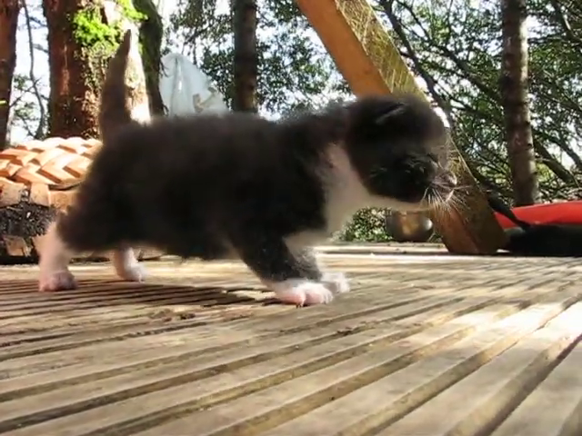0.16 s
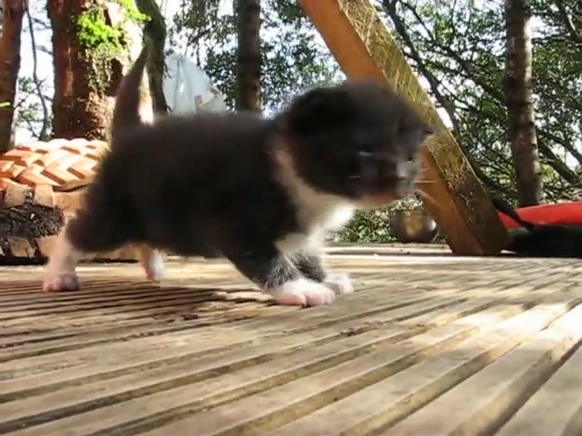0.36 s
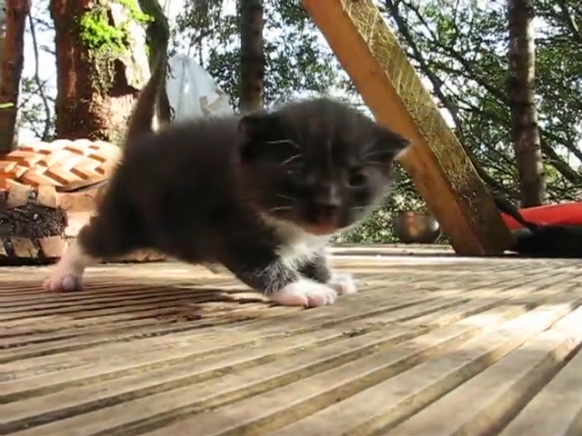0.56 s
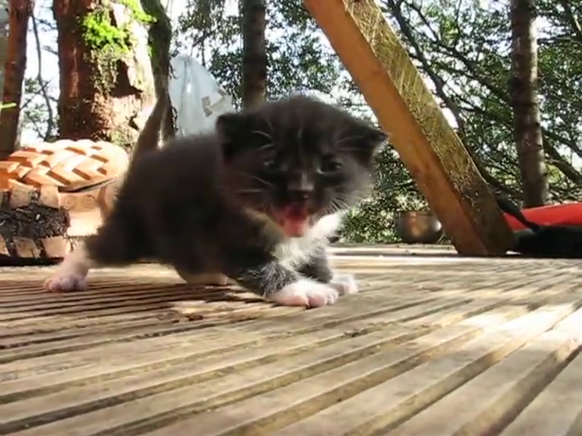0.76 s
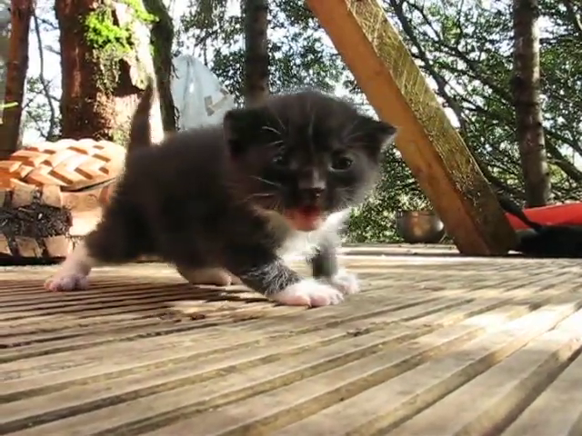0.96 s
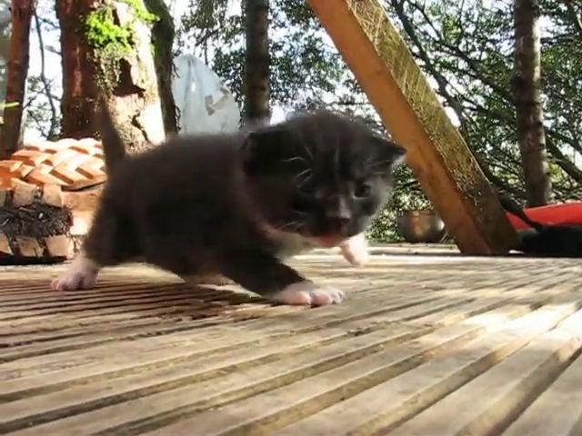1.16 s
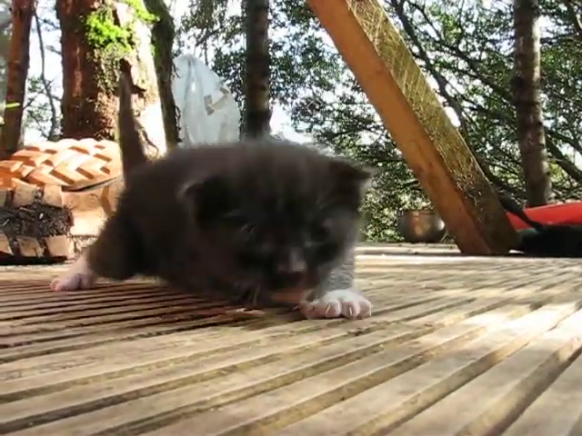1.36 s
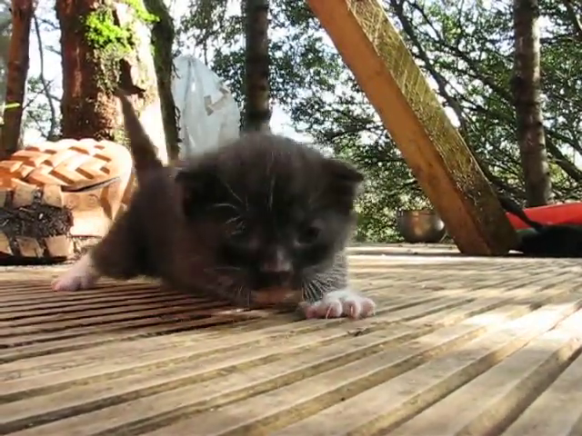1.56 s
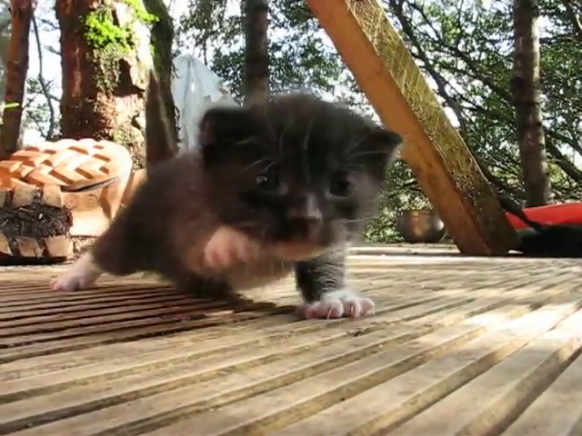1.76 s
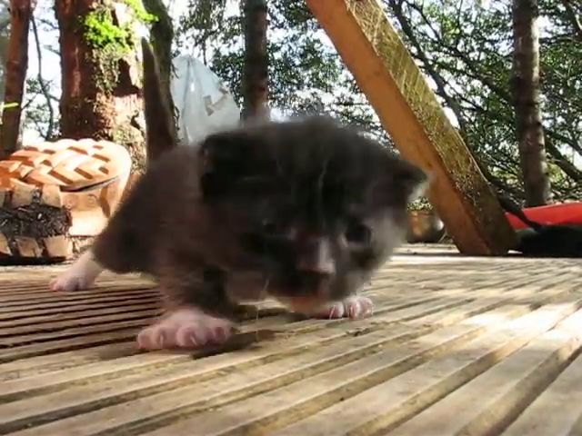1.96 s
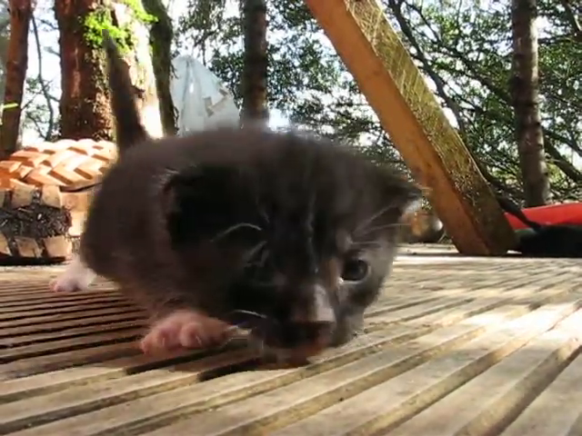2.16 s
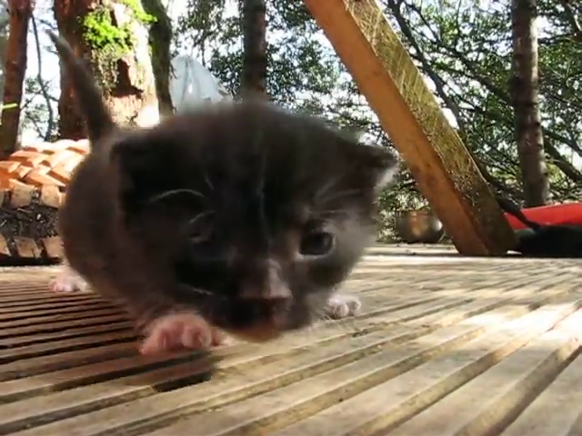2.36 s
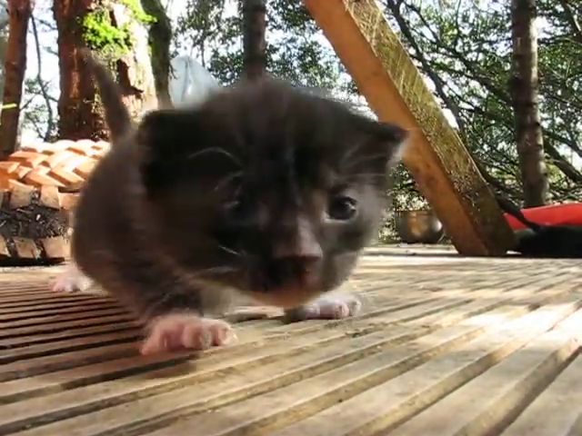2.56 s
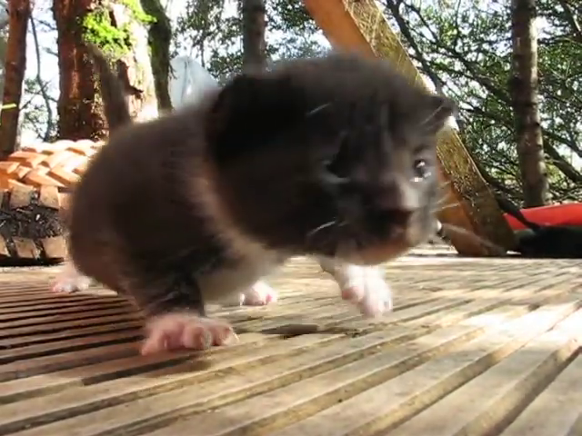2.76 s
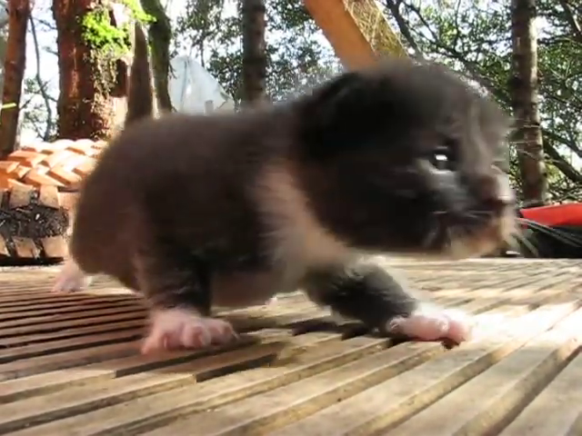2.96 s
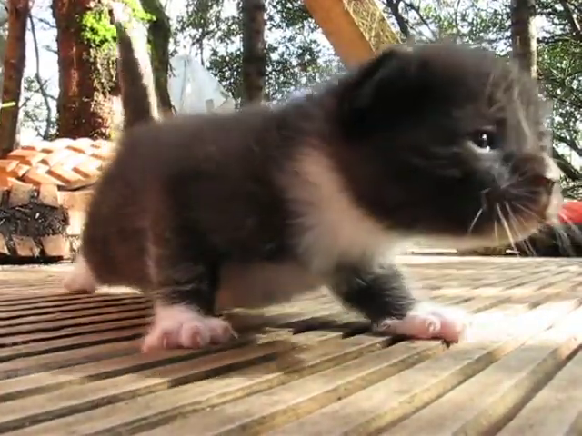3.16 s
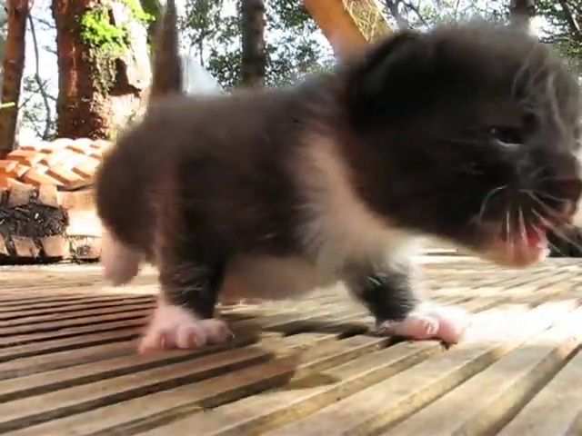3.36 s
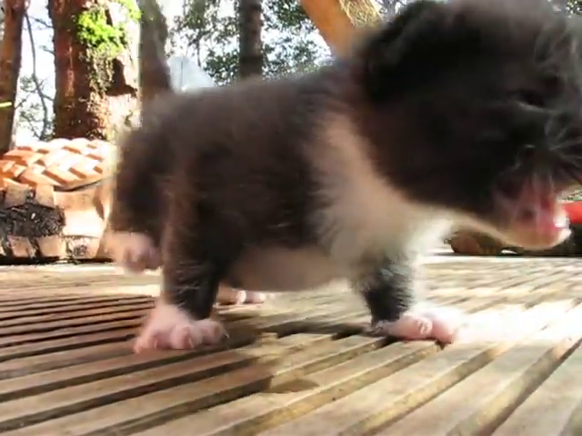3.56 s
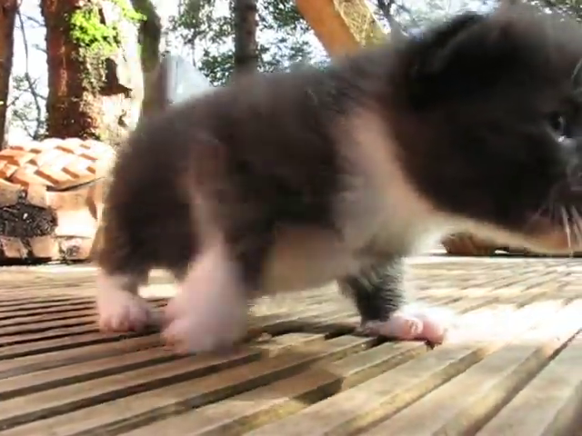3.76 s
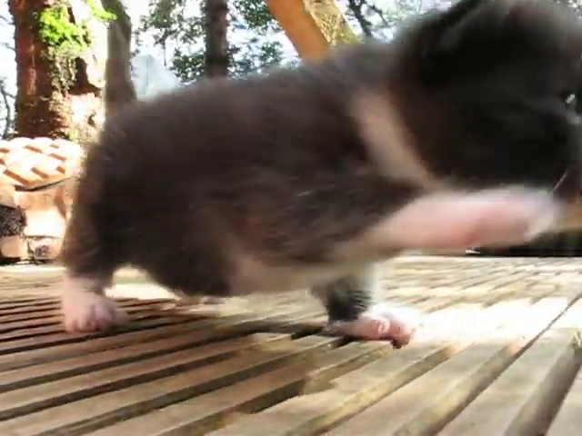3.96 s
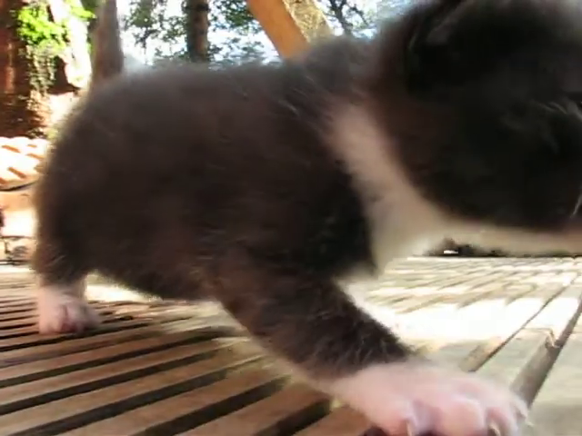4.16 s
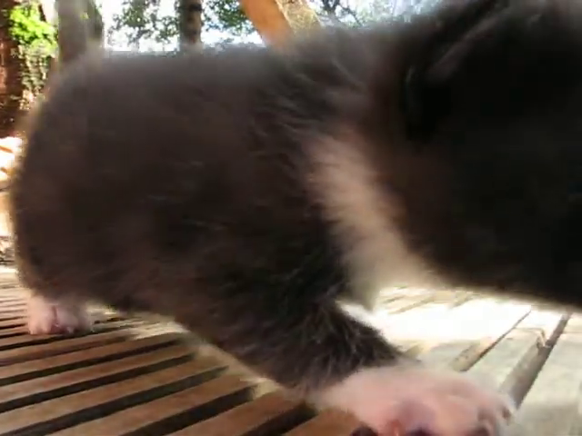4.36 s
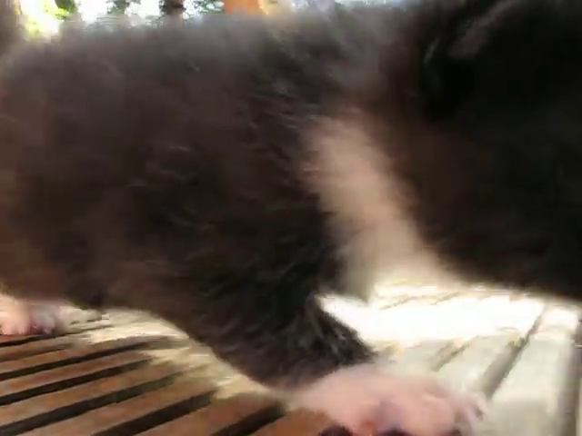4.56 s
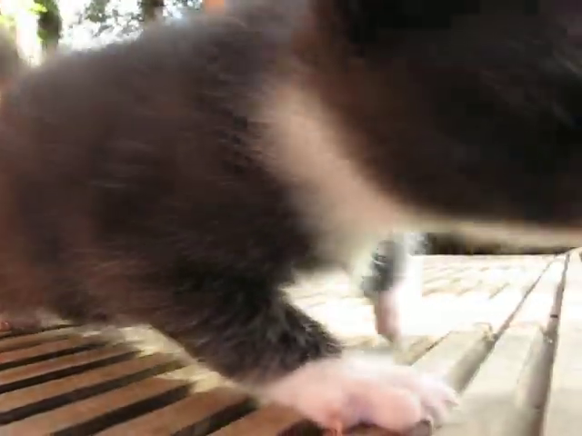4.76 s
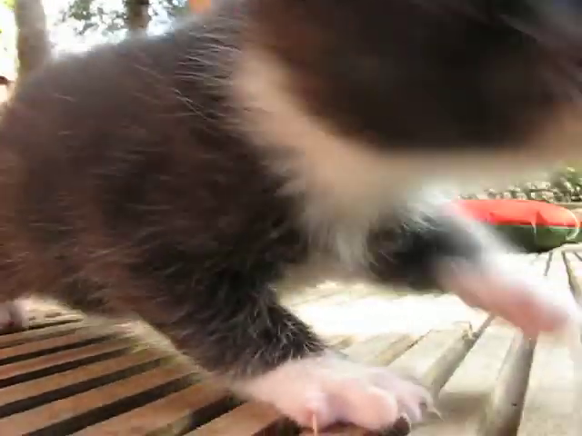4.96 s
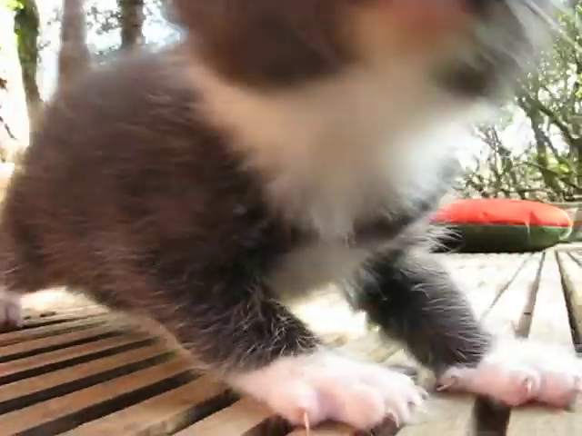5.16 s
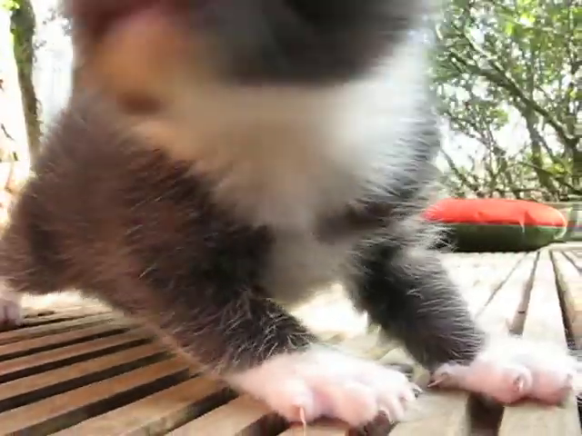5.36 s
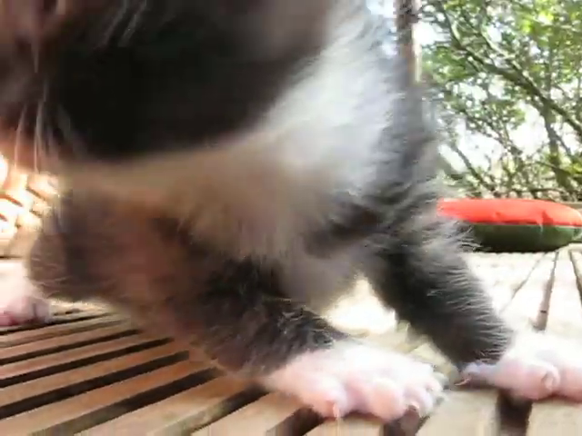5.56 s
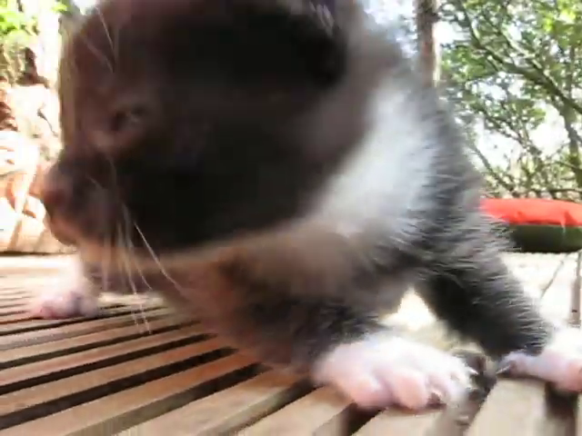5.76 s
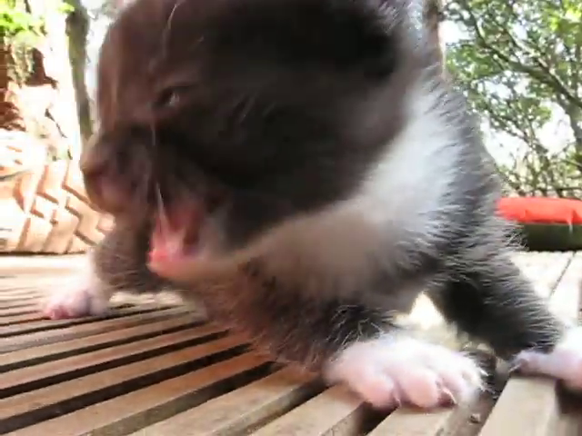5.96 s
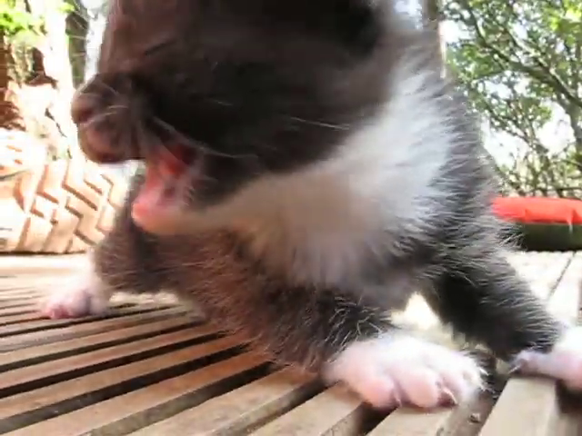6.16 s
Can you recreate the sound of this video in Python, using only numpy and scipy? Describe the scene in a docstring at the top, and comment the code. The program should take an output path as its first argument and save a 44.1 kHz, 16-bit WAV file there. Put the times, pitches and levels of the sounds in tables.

```python
"""On a wooden deck, close to a stereo microphone: first paw thuds, and gusts rumbling mostly on the left port.
A very young kitten mews (harmonics of a wavering pitch that breaks towards a whistle), then boards creak in pulses.
A second mew has faint squeaks about it; a hard object is knocked and rattles back, cracking and ringing.
Croaks surround a low third mew, fur (coloured noise) brushes close by, and a fourth, strained mew follows.
Throughout, noise makes the murmur and leaf hiss of trees all round, with a faint thin whine."""
import sys
import numpy as np
from scipy import signal
from scipy.fft import rfft, irfft, next_fast_len
from scipy.io import wavfile
from scipy.ndimage import map_coordinates

SR = 44100
rng = np.random.default_rng(int(sys.argv[2]) if len(sys.argv) > 2 else 0)


def log_audio(samples):
    """Write samples as a 16-bit WAV file to the path given in sys.argv[1]."""
    # one column per channel
    frames = np.atleast_2d(samples).T
    # limit to full scale, then quantise
    limited = np.clip(frames, -1, 1)
    pcm = np.round(limited * 32767).astype(np.int16)
    wavfile.write(sys.argv[1], SR, pcm)


N = 273861
TIME = np.arange(N) / SR
TOP_HZ = 15750  # upper band limit

# Mews: (time [s], pitch before any leap [Hz], effort before mouth and break gains [dB])
FIRST_MEW = [(0.537, 520, -50.5), (0.611, 990, -53), (0.65, 1270, -44), (0.697, 1506, -42),
             (0.708, 1410, -44), (0.727, 1583, -40.5), (0.739, 1516, -44), (0.754, 1586, -43.5),
             (0.84, 1677, -43), (0.935, 1572, -47.5), (1.015, 1377, -52.5)]
SECOND_MEW = [(3.259, 1569, -39), (3.296, 1653, -32), (3.327, 1622, -31.5), (3.365, 1835, -32.5),
              (3.47, 1918, -31.5), (3.56, 1821, -32.5), (3.588, 1800, -34.5), (3.598, 1807, -39),
              (3.645, 1780, -46)]
THIRD_MEW = [(4.886, 818, -41), (4.93, 858, -35), (4.975, 856, -38), (4.99, 850, -35),
             (5.045, 849.6, -35.5), (5.081, 780, -41), (5.104, 726, -46), (5.172, 693, -48.5)]
FOURTH_MEW = [(5.81, 770, -41), (5.832, 936, -50), (5.878, 1202, -44), (5.913, 1296, -46.5),
              (5.931, 1441, -43), (5.985, 1500, -43), (6.02, 1773, -37), (6.062, 1850, -37.5),
              (6.16, 1860, -44), (6.215, 1860, -53)]
# Mouth colour on harmonics from the third up, one per mew: (frequency [Hz], relative level [dB])
OPEN_MOUTH = [(2000, 26), (3000, 12), (4100, 6.5), (4750, -6), (5200, 5), (6700, 0), (7600, -1),
              (9000, -23), (11500, -18), (13300, -4.5), (15000, -37)]
WIDE_MOUTH = [(5000, 0.5), (5700, -15), (6500, -21), (7500, 5.5), (8500, -18), (9600, -9), (11400, -5.5),
              (12900, -13), (14200, -41)]
HALF_SHUT_MOUTH = [(1500, -10), (2500, 7), (3300, -4), (4400, -6.5), (6000, -10.5), (7200, -0.5),
                   (7900, -39), (14000, -51)]
STRAINED_MOUTH = [(3600, 16), (4400, -12), (5100, 4), (5500, -16), (6000, 0), (7300, 3.5), (8700, -12.5),
                  (11000, -22.5), (12700, 2.5), (14300, -33)]
# Jaw opening and closing, a row a mew; times from its start: (widest [s], closing time [s],
# resonance shut [Hz], resonance wide [Hz], lips part [s], overtone dulling before that [dB])
JAWS = [(0.19, 0.2, 1890, 3400, 0.19, -1.5), (0.094, 0.22, 2145, 3190, 0.061, 10),
        (0.08, 0.101, 1564, 1980, 0.093, 22), (0.16, 0.12, 2034, 3247, 0.064, 15)]
# Break of the voice, a row a mew; times from its start: (cracks [s], strain builds for [s], settles [s],
# strain while cracked [0-1], flip rate [1/s], pitch leap [share], whistle gain on first harmonic [dB],
# surge in mid-flip [dB], level flutter [dB])
VOICE_BREAKS = [(.379, 0.00874, .459, 0.5, 220, .18, 0, 10, 2),
                (.23, 0.065, .336, 0.1, 260, .225, -9, 6, 6), (.175, .07, .29, 0.6, 80, .19, 6, -1.5, 9),
                (.24, .075, .356, .43, 300, .225, 2, 0.5, 5.5)]
# Tone and place, a row a mew: (second harmonic [dB], higher overtones [dB], odd overtones [dB],
# rasp before strain [dB], hoarseness [share], left minus right below the treble lean [dB], left lead [ms])
VOICES = [(-3.5, 5, -6, -25, 0.039, -4.5, 0.016), (-19, -2, 2.5, -21.5, 0.0074, -7.5, -0.059),
          (-21, 4, 6, -21, 0.068, 5, 0.14), (-6, 7, -6, -25, 0.026, -4.5, 0.025)]
# Squeaks and croaks, mouth nearly shut: (time [s], length [s], mean pitch [Hz],
# first harmonic before swell and pan [dB], roughness [share], slope [dB per harmonic])
CROAKS = [(3.241, 0.019, 1577, -32.5, 0.03, -12), (3.681, 0.048, 2180, -48, 0.02, -17),
          (4.744, 0.11, 461, -43.5, .11, -3.5), (4.823, .075, 421.5, -42, .15, -2.5),
          (5.031, 0.17, 411, -50.5, 0.16, -1)]
# Soft blows on the deck: (time [s], frequency [Hz], level before board and scuff gains [dB],
# board t60 [s], left minus right [dB])
THUDS = [(0.058, 180, -24.5, 0.028, 22.5), (0.143, 110, -20.5, 0.055, 25.5), (0.146, 216, -30.5, 0.057, 18),
         (1.357, 94, -30, 0.05, 32), (3.133, 670, -22.5, 0.012, 4.5), (3.888, 380, -23, 0.014, 2),
         (4.722, 170, -39, 0.033, 2), (5.208, 166, -40, 0.053, 4)]
# Ticks and scuffs of claws and mouth: (time [s], level before pan [dB], centre [Hz], t60 [s])
TICKS = [(0.6207, -29.5, 5500, .008), (1.026, -42, 5350, 0.18), (2.409, -31.5, 4560, 0.011),
         (2.449, -26.5, 2220, 0.0062), (2.841, -43, 2300, 0.14), (3.076, -45, 654, 0.2),
         (3.13, -32.5, 3400, 0.019), (3.297, -27.5, 5500, 0.0077), (3.87, -41, 1470, 0.074),
         (3.898, -45, 4100, 0.12), (4.106, -38, 860, 0.067)]
# Fur brushing close by: (time [s], level before flutter [dB])
FUR = [(5.42, -67), (5.57, -46), (5.68, -38), (5.76, -40), (5.82, -49)]
# Colour of the brushing: (frequency [Hz], relative level [dB])
FUR_COLOUR = [(200, -20), (700, 10.5), (1200, -1), (3000, -6), (7500, -1), (15500, -28)]
# Contacts of the knocked object: (time [s], crack [dB], ring [dB], brightness [dB per octave])
KNOCKS = [(4.1399, -8.5, -20.5, 0), (4.1459, -11, -19.5, 3.5), (4.1509, -12.5, -16, 1.5),
          (4.1926, -27, -28, -5.5), (4.212, -12.5, -20, 3), (4.2152, -9.5, -39, 3), (4.2439, -24, -29.5, 0),
          (4.268, -40, -32, -9)]
# Modes of the knocked object: (frequency [Hz], mean relative level [dB], t60 [s])
RING_MODES = [(356, -16.5, 0.067), (455, -20, 0.13), (746, -11, 0.086), (850, -9.5, 0.072),
              (1165, -3.5, 0.031), (1261, -3.5, 0.11), (1860, -12, .04), (3245, -14, 0.088),
              (4660, -22, 0.021), (5330, -11, 0.068)]
# Colour of the crack before each contact's brightness: (frequency [Hz], relative level [dB])
CRACK_COLOUR = [(150, -24), (450, 0), (1000, -0.5), (4500, 2.5), (9000, -13), (10500, -41), (15000, -38)]
# Board creaks: (time [s], length [s], slip rate [1/s], pulse level before pressure, chance and pan [dB])
CREAKS = [(1.897, 0.064, 360, -26), (2.326, 0.026, 180, -16.5), (2.819, 0.017, 400, -28),
          (5.33, 0.056, 390, -30.5)]
# Colour of one slip: (frequency [Hz], relative level [dB])
SLIP_COLOUR = [(200, -10), (900, -6), (1900, -2.5), (3200, -5.5), (4500, -17.5), (15000, -70)]
# Gusts on the microphone ports: (peak time [s], level before port gain [dB], half length to 1/e [s])
GUSTS = [(0.03, -41, 0.074), (.18, -48, 0.059), (0.476, -50.5, 0.22), (1.407, -48, 0.055),
         (1.855, -51.5, .06), (2.074, -55, 0.2), (2.333, -46.5, 0.071)]
# Colour of the wind rumble: (frequency [Hz], relative level [dB])
RUMBLE_COLOUR = [(20, -7), (50, 8.5), (90, 0.5), (300, -18), (600, -62)]
# Trees all round: (time [s], murmur before sway [dB], hiss before sway and make-up gain [dB])
TREES = [(0.0, -46.5, -47.5), (3.23, -52.5, -50), (5.1, -48, -48), (5.52, -48, -48.5), (6.21, -47, -48)]
# Colour of the open air: (frequency [Hz], relative level [dB])
AIR_COLOUR = [(60, -18.5), (150, -2.5), (220, -4), (350, -0.5), (520, -4.5), (1700, -6), (3700, -10),
              (7200, -7), (8500, -10.5), (10500, -21), (15600, -29)]
# Spread of the open air: (frequency [Hz], left-right likeness [-1 to 1])
AIR_LIKENESS = [(300, 0.97), (1400, 0.53), (6000, 0)]
# Lean of the open air: (frequency [Hz], left minus right [dB])
AIR_LEAN = [(700, 0), (2200, -2), (8100, -3), (13000, -1.5)]

EDGE_S, LIPS_S = .008, 0.012  # voice fades in or out; lips part
MOUTH_Q, MOUTH_STEEP = 10.1, 1.275  # sharpness of the mouth resonance and of its skirts
CALM_STRAIN, WHISTLE_STRAIN = 0.037, 0.92  # 0 clean, 0.5 breaking, 1 whistle
CRACK_DULL_DB = 2.5  # overtones lost when the voice is fully broken
WHISTLE_SECOND_DB = -12  # the whistle's octave, relative to the effort
KNOCK_LAG_MS = 0.11  # the object lies to the right: the left port hears it later
CALM_DB = -69.5  # air between gusts, before port gain


def amp(db):
    """Decibels to gain."""
    return 10 ** (np.asarray(db) / 20)


def unit(x):
    """Scale to rms 1."""
    return x / np.sqrt(np.mean(x ** 2) + 1e-20)


def along(points, hz):
    """Read (frequency, value) points on a log frequency axis."""
    f, v = np.transpose(points)
    return np.interp(np.log(hz + 1), np.log(f + 1), v)


def curves(rows, t=TIME):
    """Read each column after the time at times t."""
    s, *cols = np.transpose(rows)
    return [np.interp(t, s, c) for c in cols]


def wobble(rate, size=N):
    """A smooth random curve, rate knots a second."""
    knots = rng.standard_normal(size // 8 + 4)
    return map_coordinates(knots, [np.arange(size) * rate / SR], mode="mirror")


def filtered(x, response):
    """Multiply the spectrum of x by a response of frequency."""
    size = x.shape[-1]
    m = next_fast_len(size + 4096)
    return irfft(rfft(x, m) * response(np.fft.rfftfreq(m, 1 / SR)), m)[..., :size]


def noise(spectrum, size=N):
    """Coloured noise of rms 1."""
    return unit(filtered(rng.standard_normal(size), lambda hz: amp(along(spectrum, hz))))


def panned(x, left_db):
    """A left-right pair with a level difference."""
    return np.array([x * amp(left_db / 2), x * amp(-left_db / 2)])


def add(out, s, sound):
    """Mix a stereo sound in at time s."""
    part = out[:, max(round(s * SR), 0):][:, :sound.shape[1]]
    part += sound[:, :part.shape[1]]


def kitten():
    """Two thin, high mews, a lower croaky one with the mouth half shut, and a last strained one."""
    out = np.zeros((2, N))
    mews = [FIRST_MEW, SECOND_MEW, THIRD_MEW, FOURTH_MEW]
    mouths = [OPEN_MOUTH, WIDE_MOUTH, HALF_SHUT_MOUTH, STRAINED_MOUTH]
    for rows, *manner in zip(mews, JAWS, VOICE_BREAKS, VOICES, mouths):
        add(out, rows[0][0], mew(rows, *manner))
    return out


def mew(rows, jaw, voice_break, tone, mouth):
    """Vocal-fold harmonics through a moving jaw resonance; strain flips the folds between two registers."""
    widest_s, closing_s, shut_hz, wide_hz, lips_s, dull_db = jaw
    crack_s, build_s, settle_s, cracked, flip_rate, leap, whistle_db, surge_db, flutter_db = voice_break
    second_db, high_db, odd_db, rasp_db, hoarse, left_db, lead_ms = tone
    t = np.arange(0, rows[-1][0] - rows[0][0], 1 / SR)
    size = len(t)
    chest_hz, effort_db = curves(rows, t + rows[0][0])

    resonance_hz = np.interp(t, [0, widest_s, widest_s + closing_s], [shut_hz, wide_hz, shut_hz])
    lips_shut = np.clip(.5 - (t - lips_s) / LIPS_S, 0, 1)
    overtones = amp(effort_db + high_db - dull_db * lips_shut)

    # strain near one half leaves the voice most unsteady
    strain_times = [crack_s, crack_s + build_s, settle_s - EDGE_S, settle_s]
    strain = np.interp(t, strain_times, [CALM_STRAIN, cracked, cracked, WHISTLE_STRAIN])
    unsteady = np.sqrt(np.clip(strain * (1 - strain), 0, 1))
    may_flip = np.clip((t - crack_s) / .004, 0, 1)
    register_pull = 2.2 * (strain - .5) / (unsteady + .2)
    register_chance = 2.6 * unsteady * wobble(flip_rate, size)
    whistle = may_flip * (.5 + .5 * np.tanh(register_pull + register_chance))
    flipping = 4 * whistle * (1 - whistle)  # peaks midway between the registers
    broken = may_flip * (2 * unsteady) ** 2
    shake_db = flutter_db * broken * np.tanh(2 * wobble(flip_rate, size))

    break_db = whistle_db * whistle + surge_db * flipping + shake_db
    first = amp(effort_db + mouth_db(chest_hz, resonance_hz) + break_db)
    second = amp(effort_db + mouth_db(2 * chest_hz, resonance_hz) + second_db)
    second = second + amp(effort_db + WHISTLE_SECOND_DB) * whistle

    jitter = .0055 * wobble(130, size) + .0065 * wobble(900, size)
    hoarseness = hoarse * unsteady * wobble(1200, size)
    pitch = chest_hz * (1 + leap * whistle) * (1 + jitter + hoarseness)
    phase = 2 * np.pi * np.cumsum(pitch) / SR

    k = np.arange(1, 17)[:, None]  # harmonic numbers
    upper_hz = k[2:] * pitch
    # the shape of the fold's pulse sets the odd overtones apart
    upper = amp(along(mouth, upper_hz) + odd_db * (k[2:] % 2)) * (upper_hz < TOP_HZ)
    upper = upper / np.linalg.norm(upper, axis=0) * overtones * amp(-CRACK_DULL_DB * broken)
    gains = np.vstack([first, second, upper])
    # flutter grows up to the sixth harmonic
    shimmer = amp(.3 * np.minimum(k, 6) * np.array([wobble(300, size) for _ in k]))
    voice = np.sqrt(2) * np.sum(gains * shimmer * np.sin(k * phase), axis=0)

    # air rushes through the folds once a cycle, more so while they are unsteady
    rush_colour = [(1200, -22), (1900, 0), (2400, 9), (3200, -8)] + [p for p in mouth if p[0] > 4000]
    rush = noise(rush_colour, size) * (1 + np.cos(phase))
    rush_level = np.sqrt(np.linalg.norm(gains, axis=0) * overtones)
    voice = voice + amp(rasp_db) * (1 + 2 * unsteady) * rush_level * rush
    voice = voice * np.clip(np.minimum(t, t[-1] - t) / EDGE_S, 0, 1)

    def ports(hz):
        """One port hears the voice first; the topmost treble leans left."""
        lean_db = left_db + along([(7000, 1), (9800, -2.5), (13000, 13.5)], hz)
        lead = np.exp(1j * np.pi * hz * lead_ms / 1000 * np.array([[1], [-1]]))
        return lead * panned(0.97, lean_db)

    return filtered(voice, ports)


def mouth_db(hz, centre_hz):
    """Gain of the mouth's lowest resonance."""
    x = hz / centre_hz
    return -10 * MOUTH_STEEP * np.log10((1 - x ** 2) ** 2 + (x / MOUTH_Q) ** 2)


def croaks():
    """Squeaks about the second mew, croaks round the third: a few harmonics of an unsteady pitch."""
    out, k = np.zeros((2, N)), np.arange(1, 5)[:, None]
    for s, length, hz, db, rough, tilt_db in CROAKS:
        size = round(length * SR)
        unsteady = rough * (wobble(70, size) + wobble(900.5, size))
        phase = 2 * np.pi * np.cumsum(hz * (1 + unsteady)) / SR
        swell = np.sqrt(np.abs(np.sin(np.pi * np.arange(size) / size))) * amp(2.4 * wobble(115, size))
        harmonics = np.sum(amp(db + tilt_db * (k - 1)) * np.sin(k * phase), axis=0)
        add(out, s, panned(np.sqrt(2) * swell * harmonics, 3.4))
    return out


def paws():
    """Dull thuds: each blow sounds a quickly damped board tone and a little scuff."""
    out, t = np.zeros((2, N)), np.arange(SR // 4) / SR
    for s, hz, db, t60, left_db in THUDS:
        swell = (1 - np.exp(-t * hz)) ** 2
        board = amp(7.0 - 60 * t / t60) * np.sin(2 * np.pi * hz * t)
        scuff_colour = [(hz / 4, -12), (hz, 0), (hz * 8, -45), (hz * 20, -80)]
        scuff = amp(-8 - 60 * t / 0.076) * noise(scuff_colour, len(t))
        add(out, s, panned(amp(db) * swell * (board + scuff), left_db))
    return out


def ticks():
    """Ticks and scuffs of claws and mouth: decaying noise about a centre frequency, leaning right."""
    out, t = np.zeros((2, N)), np.arange(SR // 4) / SR
    for s, db, hz, t60 in TICKS:
        tick = noise([(hz / 6, -18), (hz, 0), (hz * 3, -22), (hz * 8, -40)], len(t))
        add(out, s, panned(amp(db - 60 * t / t60) * tick, -6.0))
    return out


def fur():
    """A soft rustle, noise separate at each port, as the kitten turns right by the microphone."""
    level_db = curves(FUR)[0] + 2.0 * wobble(40)
    rustle = np.array([noise(FUR_COLOUR), noise(FUR_COLOUR)])
    return rustle * amp(level_db) * (TIME > FUR[0][0]) * (TIME < FUR[-1][0])


def knock():
    """A hard object strikes, rocks and falls back; contacts push the air, crack and ring the same modes."""
    out, t = np.zeros((2, N)), np.arange(SR // 4) / SR
    hz, mode_db, t60 = np.transpose(RING_MODES)[:, :, None]
    contact = (t - .0004) / 0.00014
    push = -contact * np.exp(-contact ** 2 / 2)
    attack = 1 - np.exp(-t / 0.00019)
    decay = amp(-60 * t / 0.018) + amp(-16.5) * amp(-60 * t / 0.08)
    for s, crack_db, ring_db, tilt_db in KNOCKS:
        colour = [(f, db + tilt_db * np.log2(f / 2000)) for f, db in CRACK_COLOUR]
        shared = noise(colour, len(t))  # the part common to both ports
        crack = unit(np.array([shared + noise(colour, len(t)) for _ in range(2)]))
        strengths = amp(mode_db + rng.normal(0, 3.6, hz.shape) - 60 * t / t60)
        start_phase = rng.normal(0, 0.62, (2, len(hz), 1))
        ring = np.sum(strengths * np.sin(2 * np.pi * hz * t + start_phase), axis=1)
        blow = amp(crack_db) * (crack * decay + amp(-4.5) * push)
        add(out, s, (blow + amp(ring_db) * ring) * attack)
    sides = np.array([[-1], [1]])
    return filtered(out, lambda hz: np.exp(1j * np.pi * hz * KNOCK_LAG_MS / 1000 * sides))


def creaks():
    """Short runs of stick and slip that swell and ease off, each slip one dry pulse."""
    slips = np.zeros(N)
    for s, length, rate, db in CREAKS:
        times = np.arange(0, length, 1 / rate)
        chance = rng.standard_normal((64, 2))[:len(times)]
        pressure_db = np.interp(times / length, [0, .25, 1], [-4, 0, -7])
        slip_times = s + times + chance[:, 0] * .14 / rate
        slips[np.round(slip_times * SR).astype(int)] = amp(db + pressure_db + 2 * chance[:, 1])

    def pulse(hz):
        """Spectrum of one slip, turned a quarter cycle."""
        gain = amp(along(SLIP_COLOUR, hz))
        return 1j * gain / np.mean(gain)

    return panned(filtered(slips, pulse), -3.0)


def deck(x):
    """The boards and nearby posts give a short answer: a decaying noise tail."""
    t = np.arange(SR // 4) / SR
    tail = rng.standard_normal((2, len(t))) * amp(-60 * t / 0.19) * (t > .004)
    return signal.fftconvolve(x, tail / np.linalg.norm(tail[0]), axes=1)[:, :N]


def trees():
    """A low murmur much alike at both ports and a wide hiss of leaves, both swaying."""
    murmur_db, hiss_db = curves(TREES)

    def spread(hz):
        """Mid and side gains that give the likeness at each frequency."""
        turn = np.arccos(np.clip(along(AIR_LIKENESS, hz), -1, 1)) / 2
        return np.array([np.cos(turn), np.sin(turn)]) / np.cos(turn)

    mid, side = filtered(np.array([noise(AIR_COLOUR), noise(AIR_COLOUR)]), spread)
    air = filtered(np.array([mid + side, mid - side]), lambda hz: panned(1, along(AIR_LEAN, hz)))
    low = filtered(air, lambda hz: 1 / (1 + (hz / 1600) ** 4))
    murmur = unit(low) * amp(murmur_db + 1.2 * wobble(12))
    hiss = unit(air - low) * amp(hiss_db + 1.5 + 0.96 * wobble(6.3))
    return murmur + hiss


def whine():
    """A faint thin whine: a narrow band of noise, separate at each port."""
    band = lambda hz: 1 / (1 + ((hz - 8270) / 70) ** 2)
    return amp(-58.5) * np.array([unit(filtered(rng.standard_normal(N), band)) for _ in range(2)])


def breeze():
    """Each gust swells and fades; its eddies buffet each port on its own, the left one most."""
    eddies = np.array([unit(noise(RUMBLE_COLOUR) * amp(3.7 * wobble(5.11))) for _ in range(2)])
    gusts = sum(amp(db) * np.exp(-((TIME - s) / half) ** 2) for s, db, half in GUSTS)
    return eddies * (amp(CALM_DB) + gusts) * amp([[4], [-6]])  # port gains, left and right


def scene():
    """The near sounds, their faint answer from the deck, and the open air."""
    near = kitten() + croaks() + knock() + paws() + ticks() + creaks()
    echo = amp(-22) * deck(near)
    return near + echo + trees() + whine() + breeze() + fur()


def record(dry):
    """The microphone chain passes nothing above its band limit."""
    return filtered(dry, lambda hz: hz < TOP_HZ)


dry = scene()
out = record(dry)
log_audio(out)
```